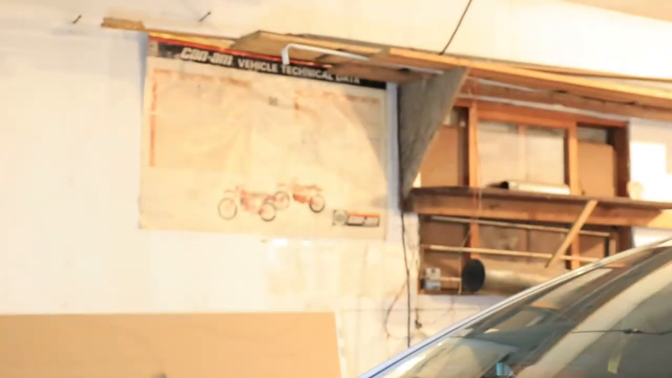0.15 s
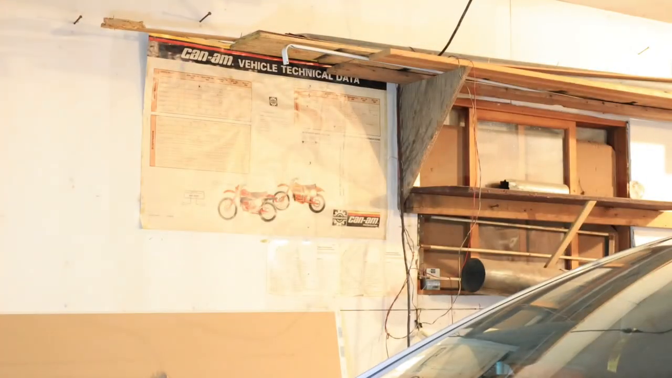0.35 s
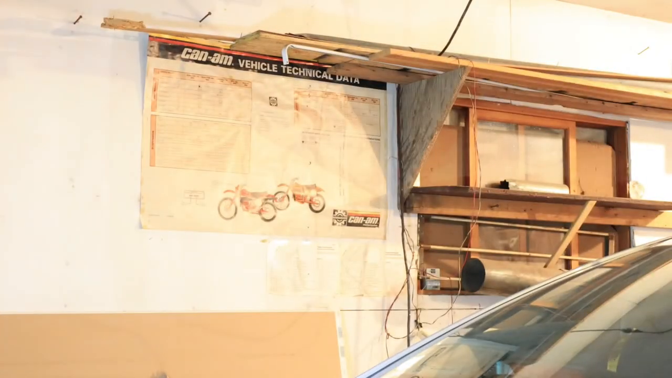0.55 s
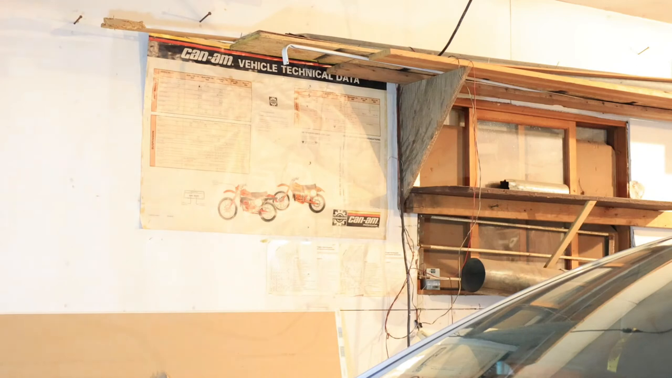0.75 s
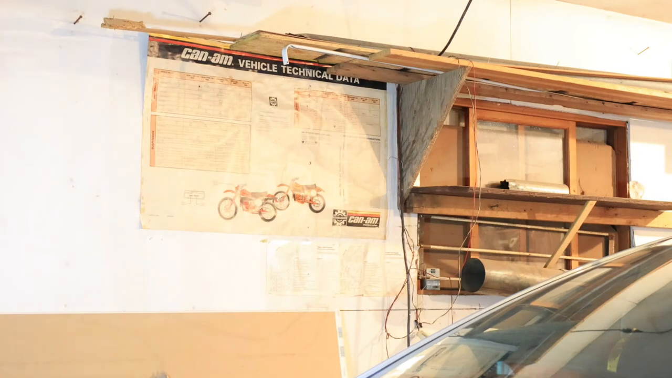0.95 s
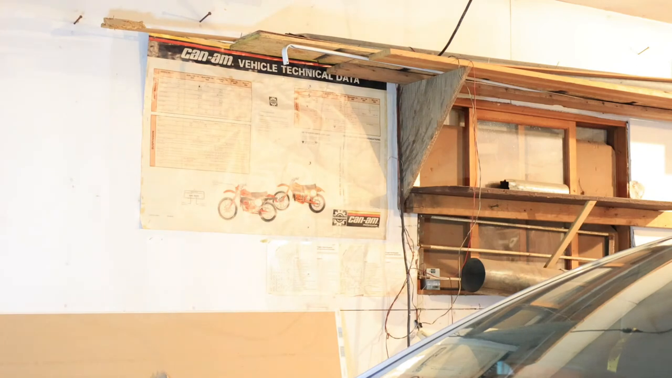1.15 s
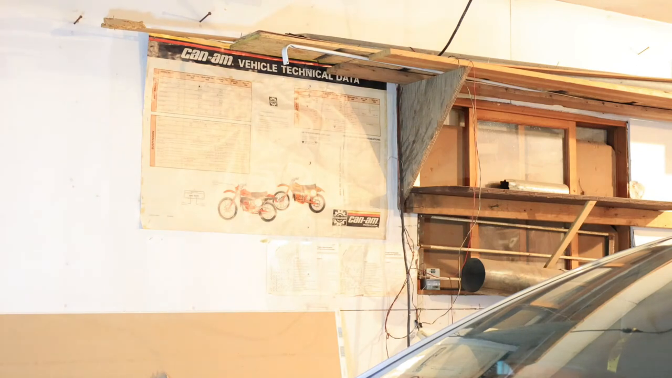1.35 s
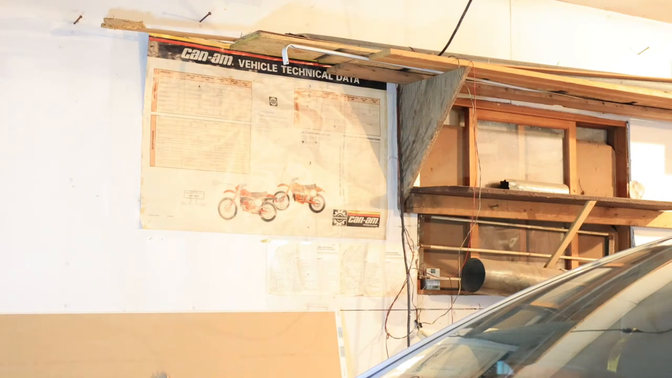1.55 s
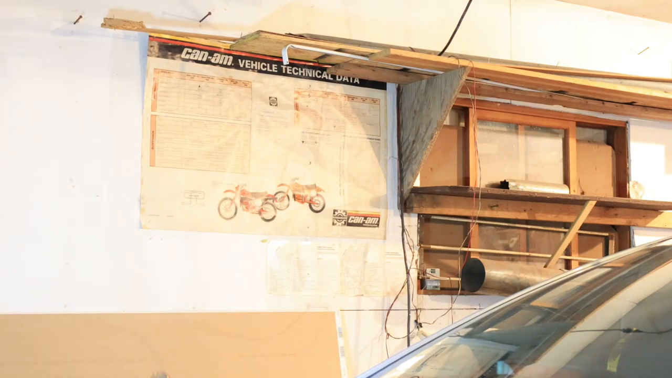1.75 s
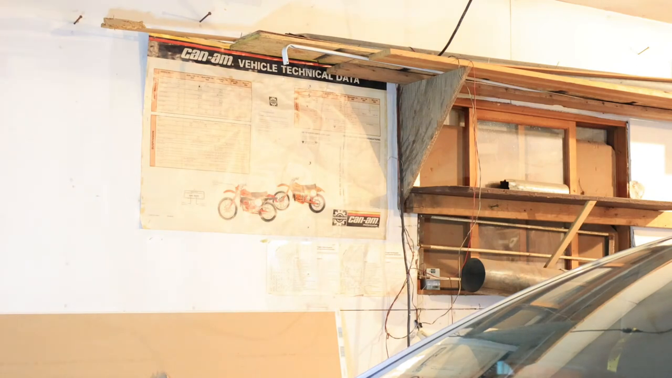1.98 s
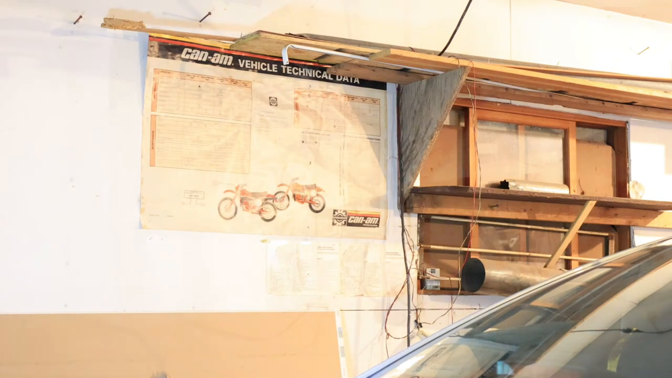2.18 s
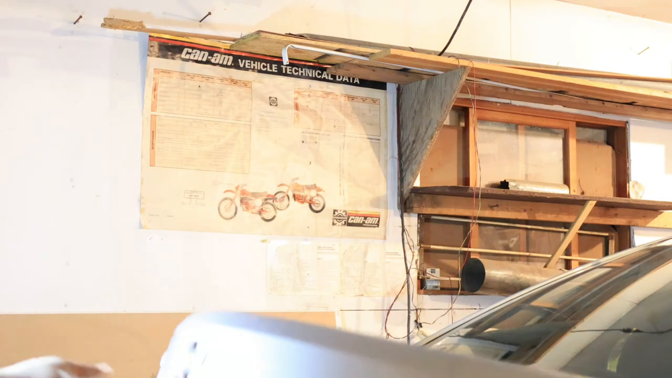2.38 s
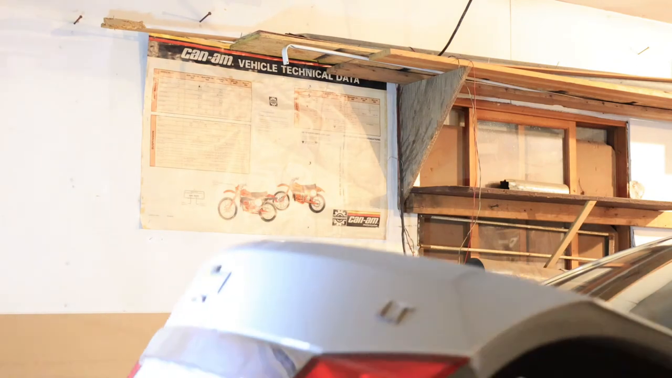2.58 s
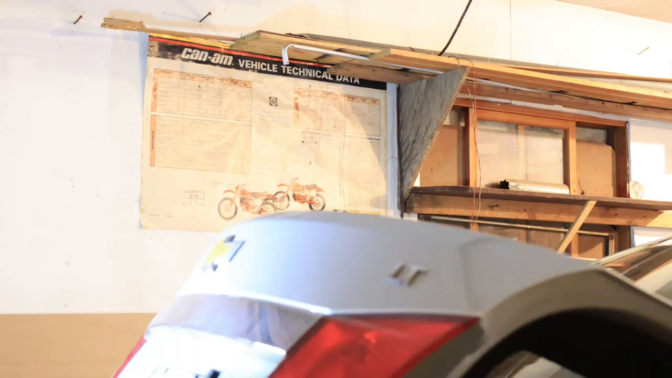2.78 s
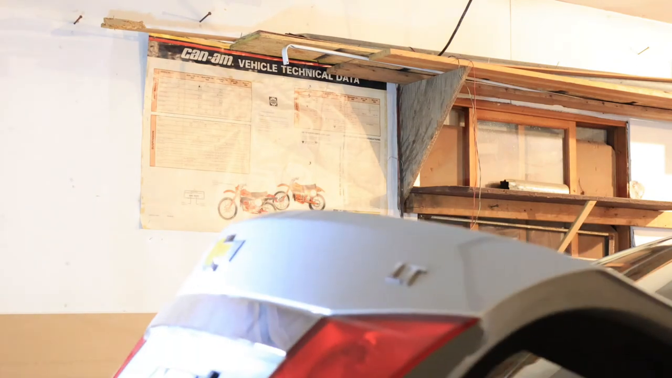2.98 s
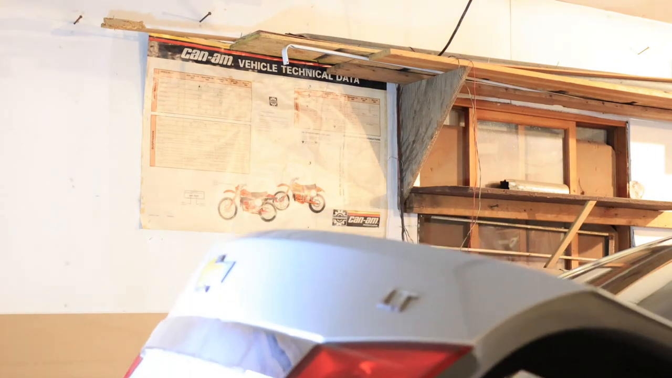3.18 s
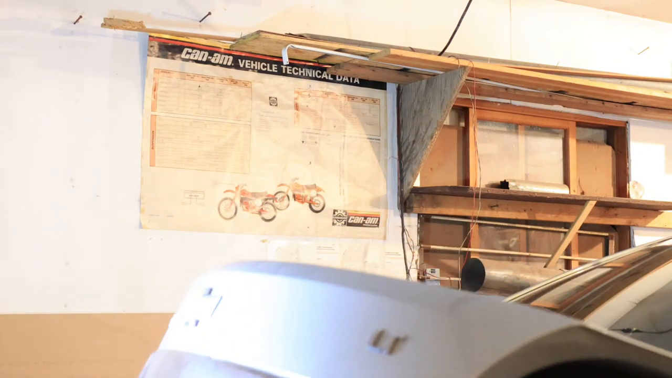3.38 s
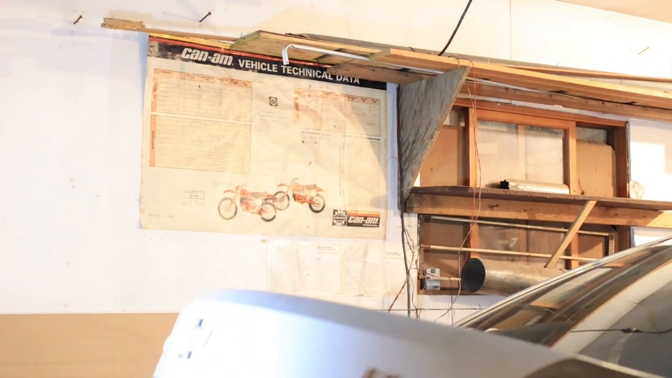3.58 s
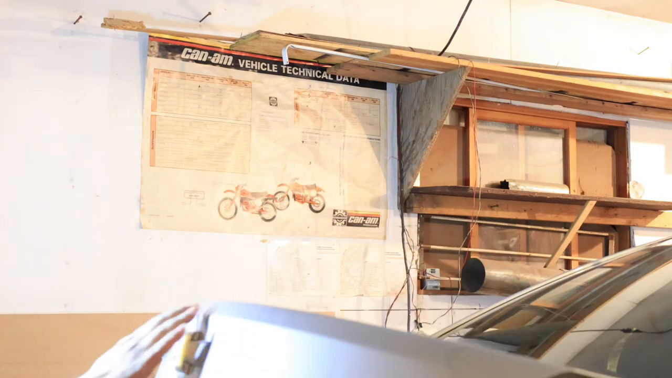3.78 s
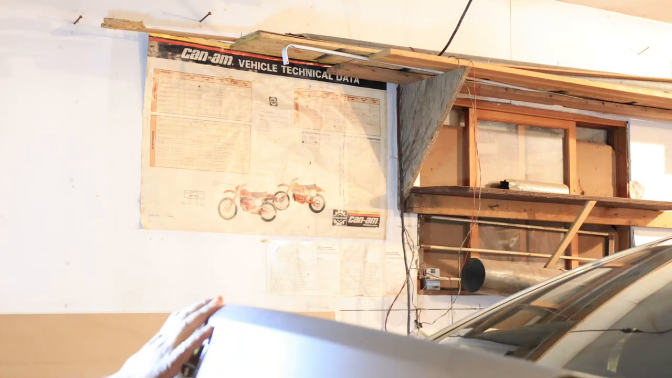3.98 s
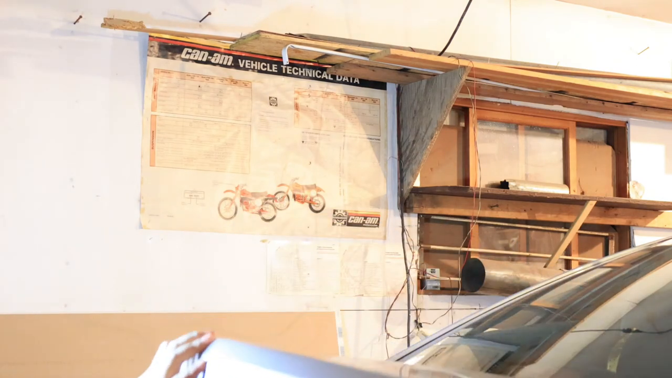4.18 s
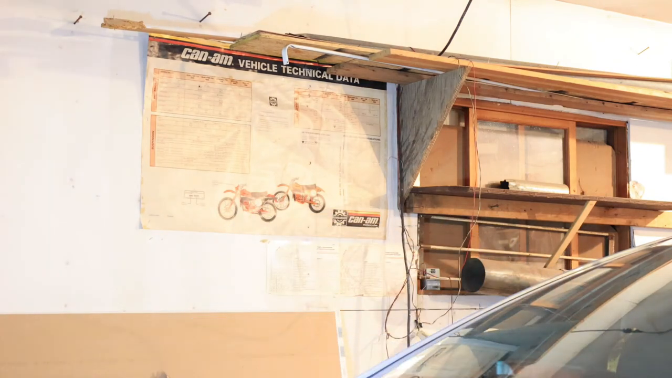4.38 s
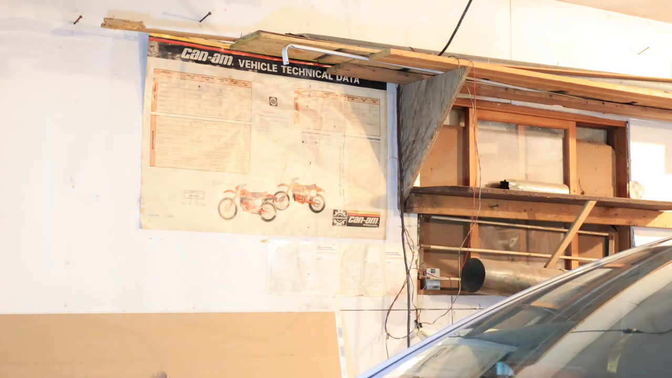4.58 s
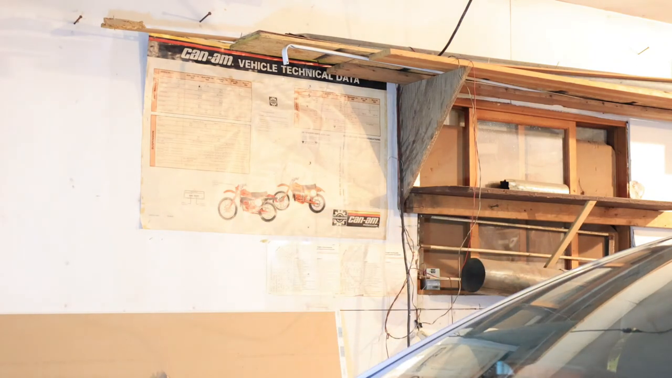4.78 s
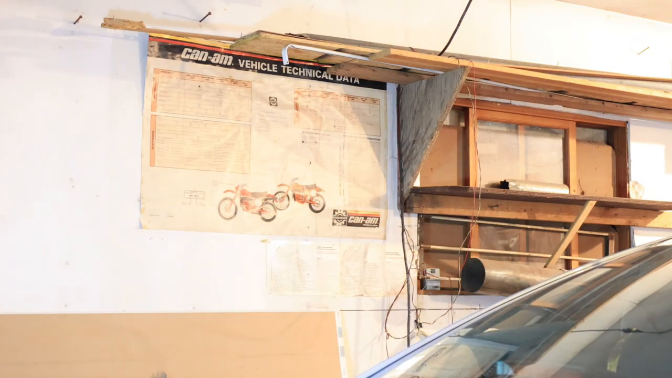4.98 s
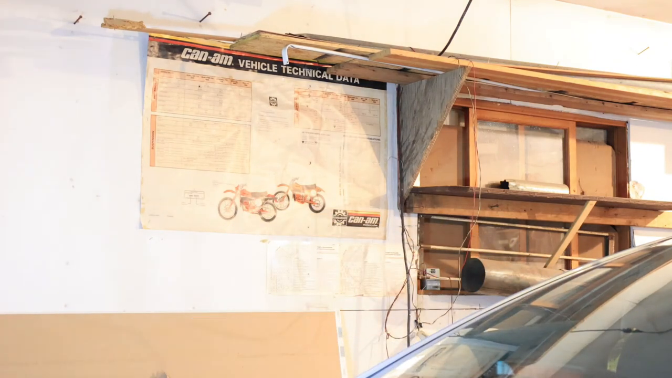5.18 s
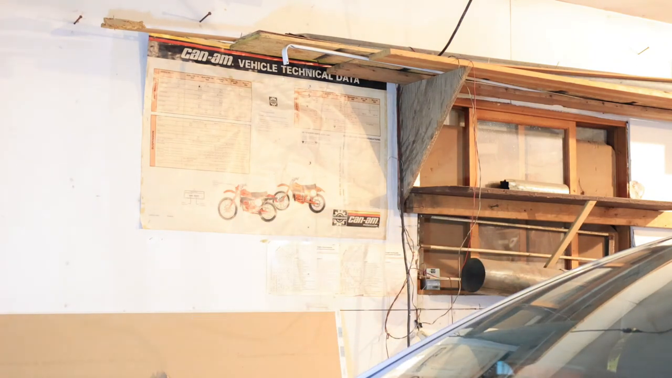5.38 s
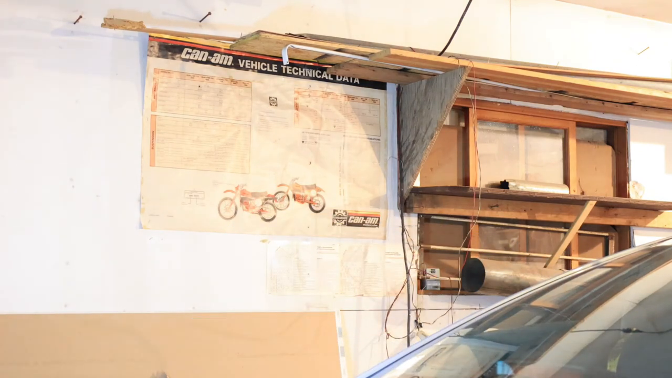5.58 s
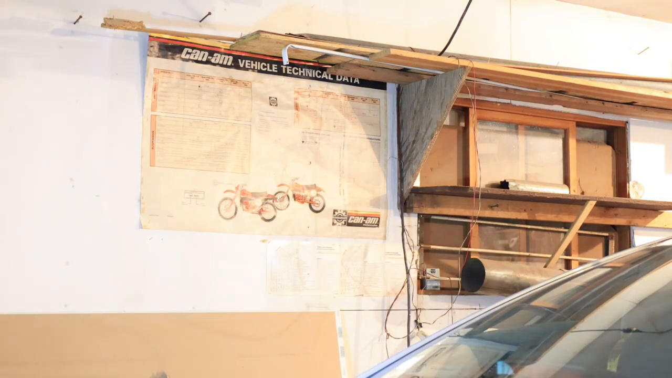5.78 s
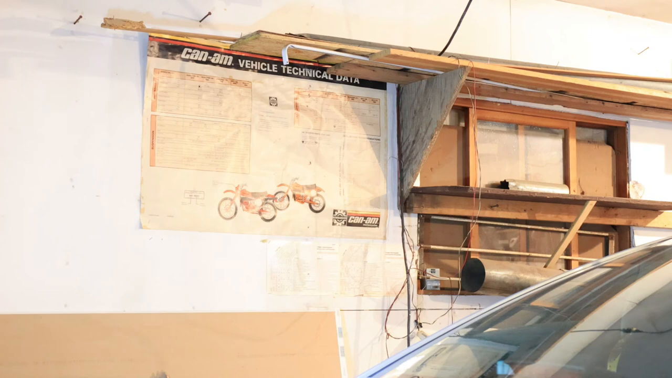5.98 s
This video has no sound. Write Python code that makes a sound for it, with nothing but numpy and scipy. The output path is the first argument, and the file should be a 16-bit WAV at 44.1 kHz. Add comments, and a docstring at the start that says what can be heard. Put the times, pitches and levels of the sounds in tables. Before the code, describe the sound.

Two heavy trunk slams, each with rattling loose part and later clacking latch release, ring through a garage over quiet hiss and cloth rustle.

```python
"""Low outside air, two faint tones, hiss and rustling sleeves are there from the start in a garage.
A trunk lid is soon pushed shut: its latch clanks, its panel booms, air thumps and a loose part rattles.
A bird chirps far outside, the latch lets the lid spring free, and the bird chirps again.
The lid slams once more, the bird chirps a third time and the latch is released again.
Noise bursts drive ringing metal; one microphone feeds the left input, the right holds hiss and a dull leak."""
import sys
import numpy as np
from scipy import signal
from scipy.fft import rfft, irfft
from scipy.io import wavfile
from scipy.ndimage import uniform_filter1d

SR = 44100
rng = np.random.default_rng(int(sys.argv[2]) if len(sys.argv) > 2 else 0)


def output_pcm(signal):
    """Save a mono or channel-first signal as 16-bit PCM at the path in sys.argv[1].

    Samples are clipped to [-1, 1] before scaling.
    """
    pcm = np.clip(np.atleast_2d(signal).T, -1, 1) * 32767
    wavfile.write(sys.argv[1], SR, np.round(pcm).astype(np.int16))


N = 266364  # length in samples

# Levels of the sources are those before the microphone's colour and gain.
# outside air, shape of its spectrum: pitch_hz, relative_level_db
AIR_SPECTRUM = [(12, -36), (20, -8), (54, -6), (86, 6.5), (160, -9), (226, -5), (260, -12), (359, -8.5),
                (385, -14), (508, -11.5), (1400, -21), (3970, -32), (5000, -37.5), (6500, -60.5),
                (11000, -120)]
AIR_DB = -70
# faint tones, level before they waver: pitch_hz, rms_level_db
FAINT_TONES = [(359, -86), (517, -91)]
# input noise, shape of its spectrum: pitch_hz, relative_level_db
HISS_SPECTRUM = [(20, 12), (60, 13), (300, 11.5), (1000, 8), (3000, 5), (8000, 1), (16000, -2.5)]
HISS_DB = -74

# soft cloth noise over time: time_s, level_db
CLOTH_LEVEL = [(0, -65), (.6, -67), (.78, -64.5), (1.1, -76.5), (1.4, -89), (1.65, -76.5), (2.05, -85),
               (2.6, -78), (2.9, -96), (3.8, -93), (4., -76), (4.35, -84), (5.3, -80.5), (5.7, -74.5),
               (6.04, -70.5)]
CLOTH_TREBLE_DB = -21.5  # relative to the soft cloth noise
# quick brushes of sleeve or hand: start_s, length_s, level_db, treble_above_level_db, squeak_hz
BRUSHES = [(1.263, 0.027, -77.5, -15, 3010), (3.867, 0.044, -71.5, -1, 5900),
           (4.972, 0.046, -72, -10, 3060), (5.105, 0.056, -68.5, -12, 2930), (5.23, 0.049, -69.5, -8, 3830)]
BRUSH_RISE_S, BRUSH_FALL_S = 0.015, 0.029
SQUEAK_DB, SQUEAK_WIDTH = -5, 0.054  # width: share of the squeak's pitch to each side

# lone knocks and ticks of lid, hinge and hand:
# start_s, clank_db, bright_above_clank_db, boom_above_clank_db, tick_above_clank_db
KNOCKS = [(.042, -54.5, -5, 2, -2.5), (0.787, -50, -6, -4, -28.5), (0.982, -54, -3, -2, -16),
          (1.987, -65, 0, -20, -0.5), (2.4909, -40.5, 0, -5.5, -17.5), (2.75, -69.5, 0, 13, -17.5),
          (3.096, -76.5, -9, 18.5, -16), (3.246, -43.5, -6.5, 4, -6.5), (5.019, -56.5, -17, 5.5, -24),
          (5.767, -68.5, 6, -7, 3)]
KNOCK_RISE_S, KNOCK_FALL_S = .001, .01
# contacts of one slam: after_seal_touches_s, clank_db, bright_above_clank_db,
# boom_above_clank_db, tick_above_clank_db, rise_s, fall_s
SLAM_CONTACTS = [(-.02, -59.5, -20.5, 15, -30, .012, .02), (0, -28.5, -11, 0.5, -40.5, .004, 0.031),
                 (0.017, -17.5, 0, -4.5, -24, .0025, 0.0071), (0.024, -12.5, 0, -3.5, -15, .001, 0.017),
                 (0.047, -20.5, -2, 2, -14, .0025, .01), (.057, -22.5, -10.5, 5.5, -23, .002, 0.0048),
                 (0.096, -28, -1, 5, -24, .002, .012)]
# slams: seal_touches_s, level_db, first_rattle_db, rattle_fade_per_bounce_db, rattle_tick_above_clank_db
SLAMS = [(.161, -1, -20, 2.5, -7.), (4.466, -2, -24, 6.5, -11)]
# a loose part bounces after the slam, twice per bounce, ever faster and duller
RATTLE_AFTER_S, RATTLE_GAP_S, RATTLE_SHRINK = .08, .056, .928
RATTLE_PAIR_S, RATTLE_PAIR_DB = .007, -3.5  # second hit of a bounce
RATTLE_BRIGHT_DB, RATTLE_BOOM_DB = 8, -4.5  # above the clank, at the first bounce
RATTLE_DULLS_DB = 5  # tick loss per bounce; bright clank loses half of it
RATTLE_RISE_S, RATTLE_FALL_S = .0008, .004
# contacts of one latch release: after_actuator_whirr_starts_s, clank_db, bright_above_clank_db,
# boom_above_clank_db, tick_above_clank_db, rise_s, fall_s
RELEASE_CONTACTS = [(0, -45.5, -7.5, -7.5, -35, .012, 0.056), (0.047, -32, 4, -2.5, -30, .001, 0.021),
                    (.074, -18, -8, -1, -42, 0.0021, 0.0059), (.088, -21, -12, -3.5, -45, 0.0016, 0.012),
                    (0.116, -33, 1.5, -9, -27.5, .001, 0.02), (.147, -36.5, 8, -15, -10, 0.0018, .008)]
# releases: start_s, level_db, lid_springs_free_after_s, its_crack_db
RELEASES = [(2.087, 0., .153, -25), (5.857, 0., .156, -22.5)]
CRACK_BRIGHT_DB, CRACK_BOOM_DB, CRACK_TICK_DB = 3.5, -16, -19  # above the crack's clank
CRACK_RISE_S, CRACK_FALL_S = 0.0015, 0.015

# well damped latch steel: pitch_hz, relative_level_db, fall_by_60_db_s
LATCH_MODES = [(605.4, 7.5, 0.083), (855, -3.5, 0.082), (1226, 0, 0.022), (1600, -3.5, .04),
               (2332, 1, 0.11), (3700, -1, 0.036)]
# lid panel and trunk cavity: pitch_hz, relative_level_db, fall_by_60_db_s
PANEL_MODES = [(117, -4, 0.11), (164.4, -1, .2), (209, -1, .12), (253, -2.5, 0.2), (304, -8.5, 0.087),
               (352.4, -6, 0.15), (412.7, -11.5, 0.26), (444.6, -7.5, 0.14), (564.6, -11, 0.21)]
# car on its springs and cabin air: pitch_hz, relative_level_db, fall_by_60_db_s
PUFF_MODES = [(31, -1.5, 0.24), (52, 0, 0.21), (80.55, -2, 0.56)]
# air squeezed from the trunk as the lid seals, a rebound, and a small puff at each release;
# times count from the start of the slam or release, levels are relative
SEAL_S, SEAL_DB = .024, -33.5
REBOUND_S, REBOUND_DB = 0.077, -41.
POP_S, POP_DB = 0.066, -51

# garage echo by pitch: pitch_hz, fall_by_60_db_s, relative_level_db
GARAGE_ECHO = [(60, 0.73, -1), (150, 0.4, -2), (410, .7, -2.5), (1000, 0.59, 3.5), (2460, 0.54, -2),
               (4500, 0.51, 0.5), (6040, 0.47, 0), (10200, 0.41, -5.5), (16000, 0.38, -10)]
GARAGE_DB = -6.5

# the far bird's phrase: after_song_start_s, length_s, start_pitch_hz, end_pitch_hz, level_db
BIRD_PHRASE = [(0, 0.065, 4120, 4200, -69.5), (.04, .05, 4080, 3700, -67), (0.064, .075, 3250, 3000, -70)]
# when the phrase is sung: start_s, pitch_factor, level_change_db
BIRD_SONGS = [(1.747, 0.98, -1), (3.603, 1.03, -2.5), (5.426, 1.01, 0.)]

# colour of the microphone capsule: pitch_hz, gain_db
MIC_COLOUR = [(20, 2.5), (2000, 0.5), (2600, -3), (3600, -1), (4400, -1.5), (4900, -3), (7000, -0.5),
              (16000, -13)]
MIC_DB = 6.
LEAK_DB, LEAK_HZ, LEAK_FLAT_DB = -37, 142.8, -56.5  # bass leak, its corner, leak at all pitches
TOP_HZ = 15750  # the treble ends here


def undb(db):
    """Turn decibels into a plain factor."""
    return 10 ** (np.asarray(db) / 20)


def level(x, db):
    """Scale a sound to an rms level in dB."""
    return x * undb(db) / np.sqrt(np.mean(x ** 2))


def band(x, lo_hz, hi_hz):
    """Keep mainly the pitches between two limits."""
    return signal.sosfilt(signal.butter(2, [lo_hz, hi_hz], "bandpass", fs=SR, output="sos"), x)


def band_noise(lo_hz, hi_hz):
    """Fresh noise between two pitch limits."""
    return band(rng.standard_normal(N), lo_hz, hi_hz)


def curve(f, hz, values):
    """Read values between points on a logarithmic pitch scale."""
    return np.interp(np.log(f), np.log(hz), values)


def noise(spectrum):
    """Noise of rms 1 whose spectrum follows (Hz, dB) points."""
    hz, db = np.transpose(spectrum)
    f = np.maximum(np.fft.rfftfreq(N, 1 / SR), 1)
    shaped = rfft(rng.standard_normal(N)) * undb(curve(f, hz, db))
    return level(irfft(shaped, N), 0)


def walk(rate):
    """Slow random wander: values held for 1 / rate s, then smoothed twice; spread near 1."""
    k = int(SR / rate)
    steps = np.repeat(rng.standard_normal(N // k + 1), k)
    return 1.3 * uniform_filter1d(uniform_filter1d(steps, k), k)[:N]


def ring(push, modes):
    """A push makes a body ring at several dying pitches, neighbours in opposite phase."""
    out = 0
    for k, (hz, db, t60) in enumerate(modes):
        pole = np.exp(2j * np.pi * hz / SR - np.log(1000) / (t60 * SR))
        mode = signal.lfilter([1], [1, -pole], push).imag
        out = out + (-1) ** k * undb(db) * mode
    return out


def faint_tones():
    """Steady pitches whose level and phase waver at random."""
    t = np.arange(N) / SR
    out = 0
    for hz, db in FAINT_TONES:
        loudness = undb(db + 4.9 * walk(3.8)) * np.sqrt(2)
        out = out + loudness * np.sin(2 * np.pi * hz * t + 3.0 * walk(5.5))
    return out


def air():
    """Low rumble from outside that swells slowly, with the faint tones."""
    swell = undb(2.4 * walk(1))
    return level(noise(AIR_SPECTRUM) * swell, AIR_DB) + faint_tones()


def rustle():
    """Rubbing cloth gives grainy noise: a dull swish, a middle band and treble; brushes squeak a little."""
    t = np.arange(N) / SR
    soft = undb(np.interp(t, *np.transpose(CLOTH_LEVEL)))
    crisp = soft * undb(CLOTH_TREBLE_DB)
    squeak = 0
    rub = rng.standard_normal(N)
    for s, length, db, treble_db, hz in BRUSHES:
        rise = np.clip((t - s) / BRUSH_RISE_S, 0, 1)
        swell = rise * np.exp(-np.maximum(t - s - length, 0) / BRUSH_FALL_S)
        soft = soft + undb(db) * swell
        crisp = crisp + undb(db + treble_db) * swell
        squeal = band(rub, hz * (1 - SQUEAK_WIDTH), hz * (1 + SQUEAK_WIDTH))
        squeak = squeak + swell * level(squeal, db + SQUEAK_DB)
    grain = undb(2.5 * walk(40))
    swish = level(grain * band_noise(300., 2000.), -2.)
    body = level(grain * band(band_noise(2600., 4600.), 2000., 4500.), -2.)
    treble = level(grain * band_noise(4800., 9900.), 0)
    return soft * (swish + body) + crisp * treble + grain * squeak


def rattle(start, first_db, fade_db, tick_db):
    """A loose part bounces seven times, two hits each, with shrinking gaps and less treble."""
    rows = []
    s = start + RATTLE_AFTER_S
    for k in range(7):
        dull_db = RATTLE_DULLS_DB * k
        for lag, pair_db in ((0, 0), (RATTLE_PAIR_S, RATTLE_PAIR_DB)):
            rows.append((s + lag, first_db - fade_db * k + pair_db,
                         RATTLE_BRIGHT_DB - dull_db / 2, RATTLE_BOOM_DB,
                         tick_db - dull_db + pair_db, RATTLE_RISE_S, RATTLE_FALL_S))
        s += RATTLE_GAP_S * RATTLE_SHRINK ** k
    return rows


def blows():
    """List every contact: start_s, clank_db, bright, boom and tick above it in dB, rise_s, fall_s."""
    rows = [tuple(row) + (KNOCK_RISE_S, KNOCK_FALL_S) for row in KNOCKS]
    for start, db, rattle_db, fade_db, tick_db in SLAMS:
        rows += [(start + row[0], db + row[1]) + tuple(row[2:]) for row in SLAM_CONTACTS]
        rows += rattle(start, rattle_db, fade_db, tick_db)
    for start, db, free_s, crack_db in RELEASES:
        rows += [(start + row[0], db + row[1]) + tuple(row[2:]) for row in RELEASE_CONTACTS]
        rows.append((start + free_s, crack_db, CRACK_BRIGHT_DB, CRACK_BOOM_DB, CRACK_TICK_DB,
                     CRACK_RISE_S, CRACK_FALL_S))
    return rows


def latch(clank, bright):
    """Contacts scrape the latch as noise, and further noise of the same shape makes its steel ring."""
    scrape = clank * level(band_noise(450., 1700.), 0)
    scrape = scrape + bright * level(band(band_noise(1500., 3700.), 1000., 6000.), 0)
    steel_push = (clank + bright) * rng.standard_normal(N)
    return undb(-10.) * scrape + undb(-53.) * ring(steel_push, LATCH_MODES)


def panel(shove):
    """A low noisy judder is heard directly and makes the lid panel and trunk cavity boom."""
    judder = shove * level(band_noise(120., 550.), 0)
    return undb(-12.5) * judder + undb(-48.5) * ring(judder, PANEL_MODES)


def air_thump():
    """Short puffs of trunk air set the car on its springs and the cabin air swinging."""
    puffs = [(row[0] + SEAL_S, row[1] + SEAL_DB) for row in SLAMS]
    puffs += [(row[0] + REBOUND_S, REBOUND_DB) for row in SLAMS]
    puffs += [(row[0] + POP_S, row[1] + POP_DB) for row in RELEASES]
    push = np.zeros(N + SR)
    for s, db in puffs:
        push[int(s * SR)] += undb(db)
    push = np.convolve(push[:N], np.hanning(SR // 200), "full")[:N]  # 5 ms wide
    return ring(push, PUFF_MODES) * undb(-35.5)


def lid():
    """Each contact scrapes the latch, ticks briefly and shoves the panel; squeezed air thumps."""
    clank, bright, tick, shove = np.zeros((4, N + SR))
    t = np.arange(SR // 4) / SR
    for s, db, bright_db, boom_db, tick_db, rise, fall in blows():
        at = slice(int(s * SR), int(s * SR) + len(t))
        shape = (1 - np.exp(-t / rise)) * np.exp(-t / fall)
        shape = shape / shape.max()
        clank[at] += undb(db) * shape
        bright[at] += undb(db + bright_db) * shape
        tick[at] += undb(db + tick_db) * shape ** 2  # squared: a shorter burst
        shove[at] += undb(db + boom_db) * shape
    ticks = tick[:N] * level(band_noise(4500., 14500.), 0)
    return latch(clank[:N], bright[:N]) + undb(-2.5) * ticks + panel(shove[:N]) + air_thump()


def garage(x, count=4):
    """Diffuse echo of noise bands, each dying at its own rate.
    Four echo paths take turns every 10 ms, whatever is sounding, which varies the echo's colour."""
    t = np.arange(SR) / SR
    hz, t60, db = np.transpose(GARAGE_ECHO)
    echo = 0
    for f in 40 * 2 ** np.arange(0, 8.6, .5):  # half-octave bands
        fade_db = curve(f, hz, db) - 60 * t / curve(f, hz, t60)
        grains = band(rng.standard_normal((count, SR)), f / 2 ** .25, f * 2 ** .25)
        echo = echo + grains * undb(fade_db)
    echo = echo * (1 - np.exp(-t / 0.00085))  # builds up in a few ms
    echo = echo / np.sqrt(np.sum(echo ** 2, axis=1, keepdims=True))
    turn = np.arange(N) // (SR // 100) % count == np.arange(count)[:, None]
    share = uniform_filter1d(1. * turn, size=100, axis=1)  # soft handover
    path_inputs = x * np.sqrt(np.maximum(share, 0))
    return undb(GARAGE_DB) * signal.fftconvolve(path_inputs, echo, axes=1)[:, :N].sum(axis=0)


def bird():
    """Gliding, slightly warbling whistles with a soft swell; the phrase comes three times."""
    out = np.zeros(N)
    warble_hz = 61. * walk(140)
    for start, pitch, song_db in BIRD_SONGS:
        for after, length, from_hz, to_hz, db in BIRD_PHRASE:
            count = int(length * SR)
            u = np.arange(count) / count  # progress from 0 to 1
            first = int((start + after) * SR)
            at = slice(first, first + count)
            hz = pitch * (from_hz + (to_hz - from_hz) * u) + warble_hz[at]
            whistle = np.sin(2 * np.pi * np.cumsum(hz) / SR)
            out[at] += undb(db + song_db) * np.sin(np.pi * u) * whistle
    return out


def colour(x, spectrum, size=1024):
    """Filter with a gain of (Hz, dB) points that never sounds ahead of its input."""
    hz, db = np.transpose(spectrum)
    f = np.maximum(np.fft.rfftfreq(size, 1 / SR), 1)
    # folding the cepstrum of the log gain makes the filter causal
    cepstrum = irfft(np.log(undb(curve(f, hz, db))), size)
    folded = np.concatenate([cepstrum[:1], 2 * cepstrum[1:size // 2], np.zeros(size // 2)])
    return signal.fftconvolve(x, irfft(np.exp(rfft(folded)), size))[:N]


def scene():
    """Mix all sources at the microphone; the right input gets no sound of its own."""
    near, far = lid(), bird()
    # the bird is heard mostly by way of the walls
    sound = near + undb(-7.) * far + garage(near + far) + rustle() + air()
    return np.array([sound, np.zeros(N)])


def record(dry):
    """The microphone feeds the left input; mostly its bass leaks into the right; both hiss."""
    left = undb(MIC_DB) * colour(dry[0], MIC_COLOUR)
    pole = np.exp(-2 * np.pi * LEAK_HZ / SR)
    bass = signal.lfilter([1 - pole], [1, -pole], left)
    right = dry[1] + undb(LEAK_DB) * bass + undb(LEAK_FLAT_DB) * left
    hiss = np.array([noise(HISS_SPECTRUM), noise(HISS_SPECTRUM)])
    wet = np.array([left, right]) + undb(HISS_DB) * hiss
    top_cut = signal.ellip(12, .2, 90, TOP_HZ, fs=SR, output="sos")
    return signal.sosfilt(top_cut, np.clip(wet, -1, 1))


dry = scene()
out = record(dry)
output_pcm(out)
```